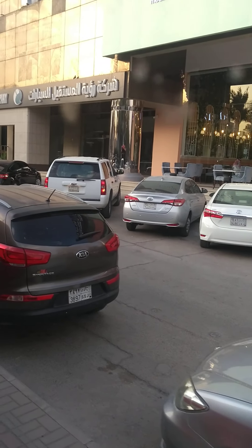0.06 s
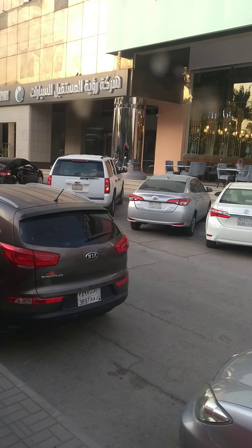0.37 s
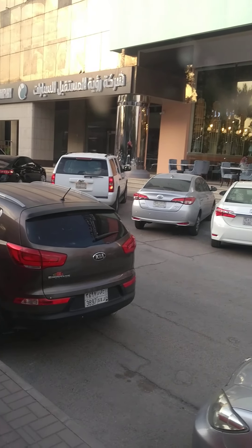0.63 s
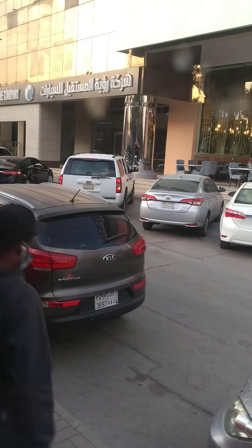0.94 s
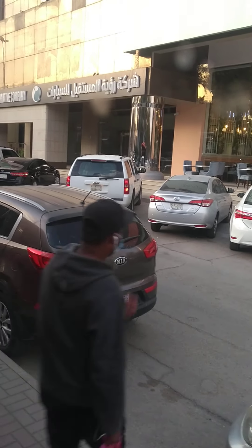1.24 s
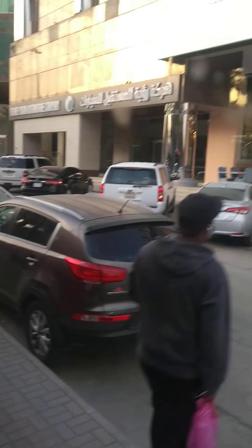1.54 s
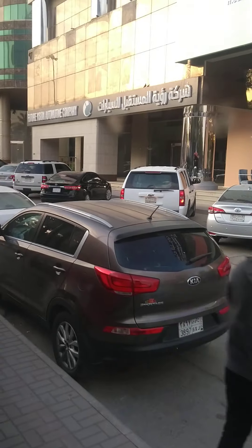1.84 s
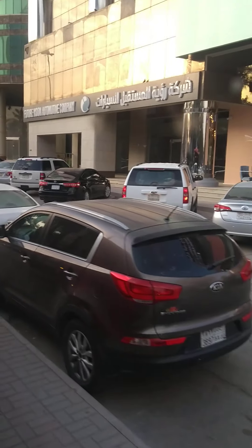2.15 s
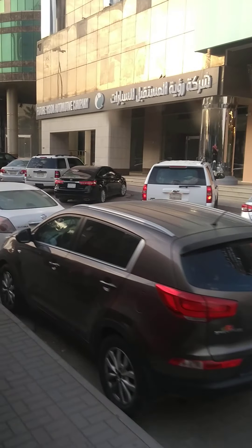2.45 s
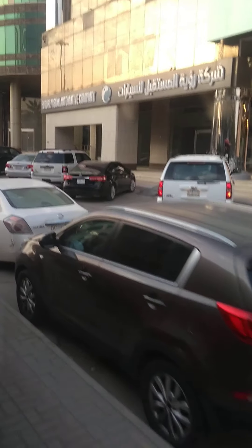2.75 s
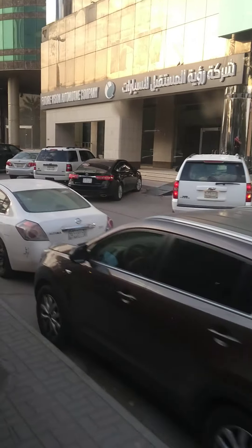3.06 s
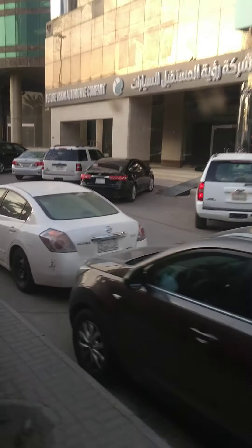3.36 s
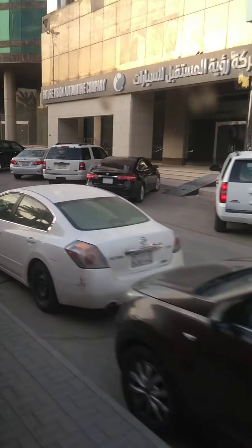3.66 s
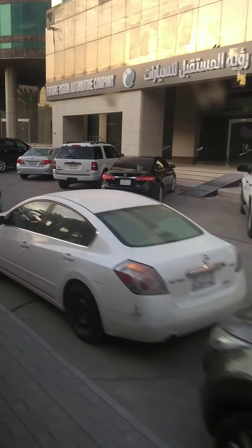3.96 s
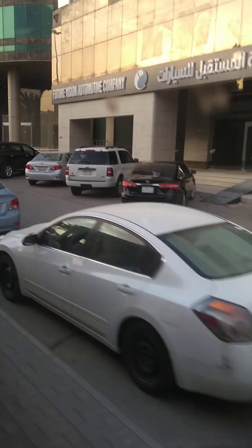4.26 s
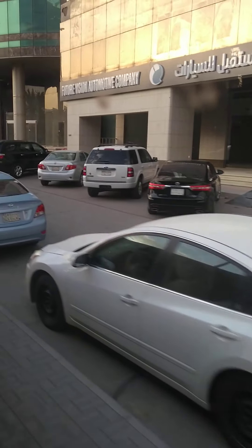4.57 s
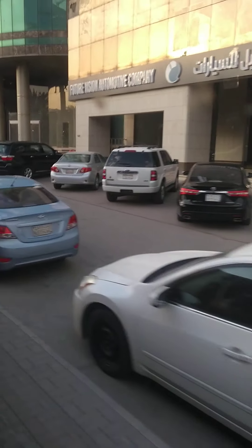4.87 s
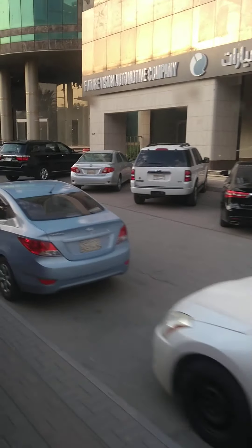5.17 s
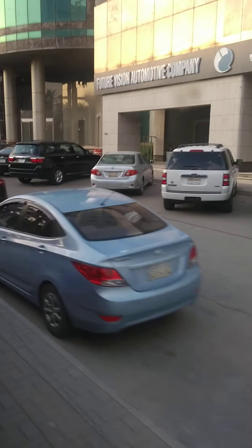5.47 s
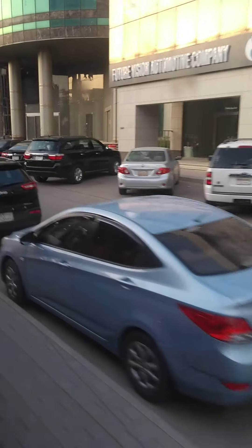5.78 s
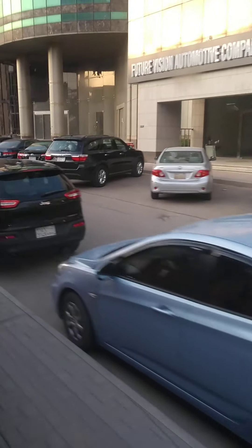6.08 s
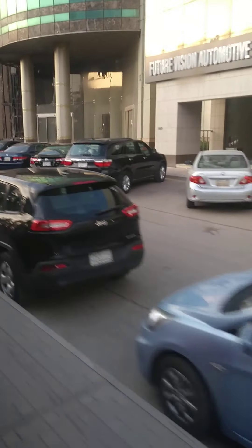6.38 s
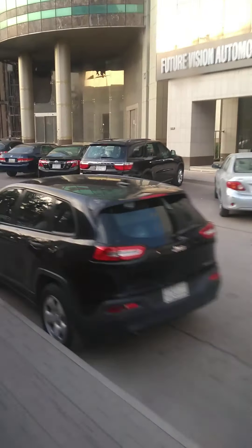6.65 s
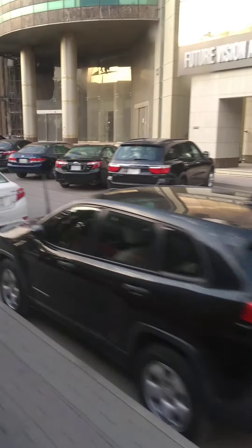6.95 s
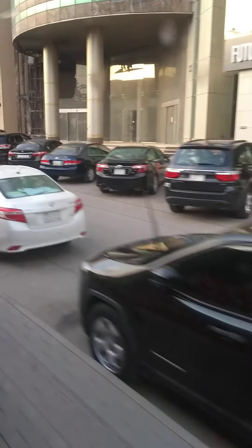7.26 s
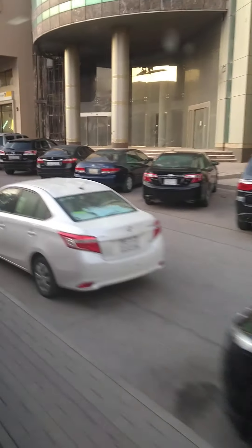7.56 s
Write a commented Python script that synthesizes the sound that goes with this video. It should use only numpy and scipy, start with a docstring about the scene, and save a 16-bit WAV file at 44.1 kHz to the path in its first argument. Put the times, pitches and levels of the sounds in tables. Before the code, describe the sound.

Inside a city bus, the engine booms and drones under tyre roar and a faint hiss from the street. About three seconds in, an air valve pops and hisses, then the brakes squeal in high, sliding, broken tones with a few dull knocks. The bus goes quiet for a moment, then pulls away with thinner squeaks. It is heard from a passenger seat.

```python
"""Inside a city bus creeping through traffic, a phone's two microphone ports at a window seat.
All around, the engine booms and drones under tyre roar, with street hiss from outside.
An air valve pops and hisses, then a rubbing part, probably a brake, squeals in sliding, broken
stick-slip tones that ring in the cabin. The bus goes quiet for a moment and pulls away again."""
import sys
import numpy as np
from scipy import signal
from scipy.fft import rfft, irfft, next_fast_len
from scipy.io import wavfile
from scipy.ndimage import uniform_filter1d, map_coordinates

SR = 44100
rng = np.random.default_rng(int(sys.argv[2]) if len(sys.argv) > 2 else 0)


def write(x):
    x = np.atleast_2d(x).T
    wavfile.write(sys.argv[1], SR, np.round(np.clip(x, -1, 1) * 32767).astype(np.int16))


N = 336042

# how alike noise is on left and right: f/Hz, likeness/0-1
STEREO_LIKENESS = [(60, 0.93), (300, 0.61), (900, 0.9), (2400, 0.92), (5000, 0.56), (12000, 0.67)]
# reverberation of the cabin: f/Hz, t60/s
CABIN_DECAY = [(200, 0.12), (4000, 0.25), (13000, 0.12)]
# how hard the bus drives; roar, hiss, drone and boom follow it: t/s, level/dB (all levels are relative)
EFFORT_CURVE = [(0.0, -39.5), (0.55, -36), (1.05, -29), (1.45, -29), (1.65, -32), (2.5, -32), (3.95, -33),
                (4.52, -28), (4.65, -40), (5.0, -40), (5.2, -50.5), (5.7, -46), (6.9, -33), (7.62, -32)]
# hiss from the street outside: f/Hz, level/dB
STREET_SPECTRUM = [(800, -42.5), (1800, -10), (3000, 0.5), (4300, 2), (5200, -6.5), (6300, -6), (8000, -15),
                   (11000, -12), (12100, -16), (14200, -19)]
# spells of that hiss: t/s, length/s, level/dB
STREET_SPELLS = [(0, 1.47, -47), (1.499, 3.9, -51.5), (6.66, 0.14, -50)]
# tyre and engine roar at the seat: f/Hz, level/dB
ROAD_SPECTRUM = [(60, -19.5), (180, -3), (300, -0.5), (480, -3.5), (850, -6.5), (1250, -14), (1420, -13.5),
                 (1560, -19), (1850, -17), (2350, -14.5), (2750, -22.5), (3200, -25), (4200, -38.5),
                 (7000, -46.5), (11000, -48), (12300, -57.5)]
# firing rate of the engine: t/s, f/Hz
FIRING_RATE = [(0, 35.9), (1.3, 37.1), (1.7, 43.23), (2.23, 54.1), (2.65, 50.12), (3.15, 51.56),
               (3.65, 61.04), (4.45, 62.9), (5.0, 50.9), (5.5, 49.23), (6.45, 58.59), (7.0, 62.03),
               (7.62, 68.42)]
# the cabin booms where the firing note meets its air modes: f/Hz, level/dB
BOOM_RESPONSE = [(36, -30), (44, -19), (47.5, -5), (57, 0.5), (60, -14), (63.4, -4.5), (68, -21)]
# engine orders: multiple of the firing rate, level/dB
DRONE_ORDERS = [(1.5, -11.5), (2, -7), (2.5, -10), (3, -5.5), (4, -18.5), (6, -14.5), (10.5, -23)]
# rumble of the panels that the engine shakes: f/Hz, level/dB
PANEL_SPECTRUM = [(25, -37), (50, -23.5), (75, -4), (100, -3), (140, -1), (200, -3), (270, -10),
                  (400, -25.5), (800, -76)]
# panels shuddering at an engine order: t/s, multiple of the firing rate, level/dB, half length/s
PANEL_SHUDDERS = [(1.555, 2, -25.5, 0.059), (1.588, 4.5, -30, 0.061), (3.346, 2, -30.5, 0.062),
                  (3.403, 2.5, -33.5, 0.24), (3.517, 10.5, -44, 0.17), (3.71, 1.5, -28.5, 0.15),
                  (5.963, 2, -38.5, 0.18), (6.628, 3, -33.5, 0.18), (7.018, 1.5, -30.5, 0.18),
                  (7.528, 2, -30.5, 0.15)]
# knocks of the valve and body: t/s, level/dB, t60 of the thud/s
KNOCK_EVENTS = [(3.187, -17.5, 0.067), (3.664, -28, 0.1094), (5.068, -33, 0.24), (5.34, -39.5, 0.2)]
# thud of a knock: f/Hz, level/dB
THUD_SPECTRUM = [(80, -22), (250, -4), (800, -2.5), (1500, -16.5), (2500, -10.5), (4200, -17), (5500, -28),
                 (14000, -30)]
# panels ringing after a knock: f/Hz, level/dB, t60/s
PANEL_MODES = [(290, -3, .035), (542, 0, 0.053), (784, -7.5, 0.07)]
# air jet of the valve: f/Hz, level/dB
JET_SPECTRUM = [(1200, -30.5), (2300, -3), (3200, -5), (3900, 2), (4350, 7.5), (4750, -2.5), (5300, -5),
                (6200, -6), (8000, -10.5), (11500, -9.5), (13000, -10.5), (14300, -19.5)]
# friction noise of the pads: f/Hz, level/dB
SCRAPE_SPECTRUM = [(2200, -3.5), (3000, 5), (4300, 6.5), (5300, -8), (7600, -1.5), (12000, -12)]
# narrow resonances of the rubbing part: f/Hz, level/dB
BRAKE_MODES = [(4221, -8.5), (5154, -16), (9165, -13), (10378, -11.5), (11266, -10), (13101, -10)]
# the ports hear each pitch of the squeal differently: f/Hz, left minus right/dB
SQUEAL_BALANCE = [(4200, 2), (5000, -6.5), (6100, -1.5), (10000, -8.5)]
# grabs of the brake: t/s, length/s, first f/Hz, last f/Hz, level/dB, roughness (0 pure, 1 and up a rasp)
BRAKE_SQUEAKS = [ (.36, 0.26, 7400, 7350, -55, 0.28), (.36, .4, 14280, 14230, -62, .08),
                 (3.928, .04, 4850, 4700, -32.5, .4), (3.97, .056, 4580, 4510, -29.5, .22),
                 (4.022, .07, 4250, 4190, -24.5, .26), (4.029, 0.1, 2780, 2470, -39, .85),
                 (4.086, 0.028, 4073, 4030, -33, 1.3), (4.097, .055, 3570, 3470, -27, .4),
                 (4.144, 0.072, 10000, 10120, -37, 0.27), (4.47, 0.038, 13050, 12360, -31.5, 0.45),
                 (4.502, 0.031, 11670, 11760, -26.5, 0.18), (4.528, 0.043, 13100, 13100, -27, 0.14),
                 (4.568, 0.024, 13150, 13100, -21.5, .05), (4.589, 0.063, 11350, 11320, -25, 0.39),
                 (4.655, 0.027, 10600, 10350, -25.5, 0.31), (4.682, 0.027, 10650, 10300, -21.5, 0),
                 (4.859, .17, 13540, 13480, -27.5, .15), (4.93, 0.2, 12840, 13100, -34.5, 1),
                 (4.903, .08, 4390, 4350, -37.5, .25), (4.985, .165, 4440, 4310, -38.5, .55),
                 (4.997, 0.034, 3800, 3780, -20, 0.22), (5.059, 0.037, 7740, 11300, -26, 1.3),
                 (5.101, 0.023, 12500, 12520, -19.5, 0.23), (5.16, 0.07, 4100, 3900, -54, .9),
                 (5.238, .066, 6650, 5750, -35, .9), (5.27, 0.082, 13100, 13200, -44.5, 0.58),
                 (5.299, 0.051, 5540, 7260, -33.5, 1.06), (5.32, 0.15, 4370, 4310, -47, 0.72),
                 (5.457, 0.11, 4220, 4900, -43, 0.053), (5.569, .22, 4870, 4770, -43, .25),
                 (5.79, .2, 4880, 4900, -42, .2), (5.768, .055, 3990, 4130, -43, .22),
                 (5.82, .058, 4400, 4420, -41.5, .42), (5.877, .115, 4650, 4740, -36.5, .37),
                 (6.003, .055, 4740, 4700, -36.5, .27), (6.055, .022, 4600, 4560, -39.5, .3),
                 (6.265, .19, 4872, 4905, -36.5, .08), (6.48, .125, 5145, 5170, -38, .09),
                 (6.578, .028, 4895, 4885, -42, .12), (6.62, 0.28, 5160, 5150, -56, .1), ]
# the brake's one long, sliding squeal: t/s, f/Hz, level/dB, roughness/0-1
BRAKE_SLIDE = [(4.729, 10100, -30, 0.55), (4.755, 9520, -26, 0.2), (4.79, 9170, -24, 0.06),
               (4.806, 8450, -31.5, 0.78), (4.823, 7360, -20.5, 0.53), (4.843, 7140, -26.5, 0.7),
               (4.852, 5860, -25, 0.1), (4.871, 5970, -17, 0), (4.885, 6040, -30.5, 0.6),
               (4.918, 6200, -33, 0.5), (4.926, 6430, -22, 0.2), (4.955, 6010, -29, 0.7),
               (4.985, 6130, -22.5, 0.5), (5.0, 5960, -13.5, 0.17), (5.013, 5960, -34, 0.22),
               (5.05, 5970, -37, 0.64)]

CRUISE_DB, CRUISE_HZ = -31, 53  # effort and firing rate of steady driving
SQUEAK_ATTACK_S, SQUEAK_FALL_DB_PER_S, SQUEAK_TAIL_S = 0.013, 1000, 0.05


def amp(db):
    """Decibels to gain."""
    return 10 ** (np.asarray(db) / 20)


def unit(x):
    """Scale to rms 1."""
    return x / np.sqrt(np.mean(x ** 2) + 1e-20)


def along(points, hz):
    """Read (f/Hz, value) points on a log frequency axis."""
    f, values = np.transpose(points)
    return np.interp(np.log(hz + 1), np.log(f + 1), values)


def curves(rows, t=np.arange(N) / SR):
    """Each column after the time, at the times t."""
    times, *columns = np.transpose(rows)
    return [np.interp(t, times, column) for column in columns]


def wobble(rate, size=N):
    """A smooth random curve, rate knots a second."""
    knots = rng.standard_normal(int(size * rate / SR) + 4)
    return map_coordinates(knots, [np.arange(size) * rate / SR])


def held(age, length, attack_s, fall_db_per_s):
    """Attack, hold and release of a sound that is age seconds old."""
    return np.clip(age / attack_s, 0, 1) * amp(-fall_db_per_s * np.maximum(age - length, 0))


def filtered(x, response):
    """Pass x through a frequency response."""
    size = next_fast_len(N + 8192)
    return irfft(rfft(x, size) * response(np.fft.rfftfreq(size, 1 / SR)), size)[..., :N]


def phase_bands(hz, centred_below_hz=1050, lag_s=0.000382, right_lean=0.4):
    """Left and right treble go in and out of phase in alternating bands, wide and leaning right."""
    turn = 2 * np.pi * np.maximum(hz - centred_below_hz, 0) * lag_s
    return np.cos(turn) - 1j * right_lean * np.sin(turn)


def widened(x):
    """Treble sounds wide, out of step between left and right; lower sound stays centred."""
    half_each_way = np.array([[0.5j], [-0.5j]])
    return filtered(x, lambda hz: np.exp(half_each_way * np.unwrap(np.angle(phase_bands(hz)))))


def rush(spectrum, patchy_db):
    """Noise of rms 1 with patches of random gain, partly alike on left and right."""
    bins = signal.stft(rng.standard_normal((2, N)), nperseg=512)[2]
    patches = uniform_filter1d(rng.standard_normal(bins.shape[1:]), 5, 0)
    patches = unit(uniform_filter1d(patches, 12, 1))
    pair = signal.istft(bins * amp(patchy_db * patches), nperseg=512)[1][:, :N]

    def mid_and_side(hz):
        likeness = along(STEREO_LIKENESS, hz) * np.abs(phase_bands(hz))
        spread = np.arccos(np.clip(likeness, -1, 1)) / 2
        return amp(along(spectrum, hz)) * [np.cos(spread), np.sin(spread)]

    mid, side = filtered(pair, mid_and_side)
    return unit(np.array([mid + side, mid - side]))


def cabin(x):
    """Glass and panels around the seat answer with a short, dense tail, different at each port."""
    mid, side = rng.standard_normal((2, SR // 2))
    hz, t, bins = signal.stft(np.array([mid + side, mid - side]), SR, nperseg=256)
    decay = amp(-60 * t / along(CABIN_DECAY, hz)[:, None])
    tail = signal.istft(bins * decay, SR, nperseg=256)[1]
    return signal.fftconvolve(x, tail / np.linalg.norm(tail[0]), axes=1)[:, :N]


def placed(x, pan_db):
    """Share a sound between left and right; positive is to the left."""
    return x * np.array([np.atleast_1d(amp(pan_db / 2)), np.atleast_1d(amp(-pan_db / 2))])


def street(effort_db, level_db=1, growth=0.71):
    """Spells of hiss from outside, slightly to the right, growing with effort."""
    t = np.arange(N) / SR
    hiss = placed(rush(STREET_SPECTRUM, patchy_db=2), pan_db=-1.5)
    spells = sum(amp(db) * held(t - start, length, attack_s=0.0038, fall_db_per_s=173)
                 for start, length, db in STREET_SPELLS)
    return hiss * spells * amp(level_db + growth * (effort_db - CRUISE_DB))


def road(firings, effort_db, level_db=2, throb=0.098):
    """Tyre and engine roar, throbbing with the firings."""
    roar = rush(ROAD_SPECTRUM, patchy_db=1.56) * (1 + throb * np.cos(2 * np.pi * firings))
    return roar * amp(effort_db + level_db)


def engine(firing_hz, firings, effort_db, unsteady_db=3, drift_cycles=0.019):
    """The firing note booms in the cabin; unsteady higher orders and shaken panels drone above it."""
    push_db = effort_db - CRUISE_DB
    boom_db = -26 + 1.27 * push_db + along(BOOM_RESPONSE, firing_hz)
    drone_db = -26.5 + 0.81 * push_db + 0.26 * (firing_hz - CRUISE_HZ)
    boom = unit(np.sin(2 * np.pi * firings))
    orders = np.zeros(N)
    for order, db in DRONE_ORDERS:
        gain = amp(db + unsteady_db * wobble(7.4))
        orders += gain * np.sin(2 * np.pi * (order * firings + drift_cycles * wobble(14)))
    drone = amp(-4) * unit(orders) + rush(PANEL_SPECTRUM, patchy_db=-0.5)
    return boom * amp(boom_db) + drone * amp(drone_db)


def throttle(coast_start_s=3.6, coast_s=1.54, coast_db=-4.5):
    """Gain of the engine: it eases off for the braking and comes back."""
    age = np.arange(N) / SR - coast_start_s
    coasting = held(age, coast_s, attack_s=0.35, fall_db_per_s=49)
    return amp(coast_db * coasting)


def shudders(firings):
    """Single engine orders swell and fade as they pass through the panels' resonances."""
    t = np.arange(N) / SR
    out = np.zeros(N)
    for peak_s, order, db, half_s in PANEL_SHUDDERS:
        swell = amp(db) * np.exp(-((t - peak_s) / half_s) ** 2)
        out += swell * np.sqrt(2) * np.sin(2 * np.pi * order * firings)
    return out


def knocks():
    """Dull blows: a thud and a short ring of the damped body."""
    t = np.arange(N) / SR
    blows = sum((t >= start) * amp(db - 60 * np.abs(t - start) / t60) for start, db, t60 in KNOCK_EVENTS)
    thuds = blows * rush(THUD_SPECTRUM, patchy_db=0)
    ring = sum(amp(db - 60 * t / t60) * np.sin(2 * np.pi * hz * t) for hz, db, t60 in PANEL_MODES)
    return thuds + sum(amp(db) * np.interp(t - start, t, ring) for start, db, _ in KNOCK_EVENTS)


def air_valve(open_s=3.186, hold_s=1.306, level_db=-42.5, surge_db=8, surge_s=0.12, sputter_db=0.9):
    """Slightly to the right, stored pressure surges out, sputters and dies away as the valve shuts."""
    age = np.maximum(np.arange(N) / SR - open_s, 0)
    jet = placed(rush(JET_SPECTRUM, patchy_db=1.7), pan_db=-2)
    opening = held(age, hold_s, attack_s=0.0051, fall_db_per_s=78)
    flow_db = level_db + surge_db * np.exp(-age / surge_s) + sputter_db * wobble(16)
    return jet * opening * amp(flow_db)


def scrape(squeals, level_db=-31):
    """Friction noise of the pads under the squeals; it swells and fades more gently than they do."""
    power = np.abs(uniform_filter1d(np.mean(squeals ** 2, axis=0), SR // 10))
    return amp(level_db) * rush(SCRAPE_SPECTRUM, patchy_db=1.5) * power ** (1 / 3)


def brake_ring(x, width_hz=22):
    """The rubbing part rings on wherever the squeal touches one of its modes."""
    mode = lambda f, hz: 1j * f * width_hz / (hz * hz - f * f + 1j * f * width_hz)
    return filtered(x, lambda f: sum(amp(db) * mode(f, hz) for hz, db in BRAKE_MODES))


def stick_slip(index, pitch_hz, gain, rough, waver=0.015, scatter=0.026, rasp_db=0.5):
    """A squeal with weak overtones; a rough contact scatters its pitch, makes it chatter and rasp."""
    jitter = lambda rate: rough * wobble(rate, size=len(index))

    def overtone(k, db):
        in_band = k * pitch_hz < SR / 2
        return in_band * amp(db + rasp_db * rough) * np.sin(k * phase + 2 * jitter(600))

    wander = waver * jitter(55)
    scattering = scatter * (0.7 * rough * jitter(2000) + 0.85 * jitter(650))
    hz = pitch_hz * (1 + wander + scattering)
    phase = 2 * np.pi * np.cumsum(hz) / SR
    chatter = 1 + np.tanh(1.5 * jitter(380)) + 0.33 * jitter(1400)
    tone = np.sin(phase) + overtone(2, db=-18) + overtone(3, db=-35)
    out = np.zeros((2, N))
    out[:, index] = placed(np.sqrt(2) * gain * chatter * tone, along(SQUEAL_BALANCE, hz))
    return out


def brake_squeak(start, length, first_hz, last_hz, db, rough, sag_db=2.5, flutter_db=2.5):
    """One grab of the brake: it catches, glides, flutters as the pads press unevenly, sags and lets go."""
    index = np.arange(int(start * SR), int((start + length + SQUEAK_TAIL_S) * SR))
    age = (index - index[0]) / SR
    progress = np.minimum(age / length, 1)
    pitch_hz = first_hz * (last_hz / first_hz) ** progress
    level_db = db - sag_db * progress + flutter_db * wobble(58, size=len(index))
    gain = amp(level_db) * held(age, length, SQUEAK_ATTACK_S, SQUEAK_FALL_DB_PER_S)
    return stick_slip(index, pitch_hz, gain, rough)


def brake_slide(level_db=1.5):
    """The long squeal sinks roughly, catches on a lower pitch and swells where it rings clean."""
    start, end = BRAKE_SLIDE[0][0], BRAKE_SLIDE[-1][0]
    index = np.arange(int(start * SR), int((end + SQUEAK_TAIL_S) * SR))
    pitch_hz, db, rough = curves(BRAKE_SLIDE, index / SR)
    contact = held(index / SR - start, end - start, SQUEAK_ATTACK_S, SQUEAK_FALL_DB_PER_S)
    return stick_slip(index, pitch_hz, amp(db + level_db) * contact, rough)


def scene(squeal_db=-1, cabin_db=-9):
    """Bus, street and brake as heard from the window seat."""
    firing_hz, effort_db = curves(FIRING_RATE)[0], curves(EFFORT_CURVE)[0]
    firings = np.cumsum(firing_hz) / SR
    drive = throttle() * engine(firing_hz, firings, effort_db) + shudders(firings)
    background = drive + road(firings, effort_db) + street(effort_db)
    valve_and_knocks = air_valve() + knocks()
    squeals = amp(squeal_db) * (brake_slide() + sum(brake_squeak(*row) for row in BRAKE_SQUEAKS))
    squeals = squeals + brake_ring(squeals)
    squeals = squeals + amp(cabin_db) * cabin(squeals)
    return widened(background + valve_and_knocks + squeals + scrape(squeals))


def record(dry, top_hz=14400):
    """The phone keeps nothing above its band limit."""
    return filtered(dry, lambda hz: hz < top_hz)


dry = scene()
out = record(dry)
write(out)
```